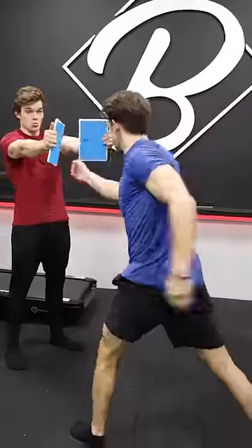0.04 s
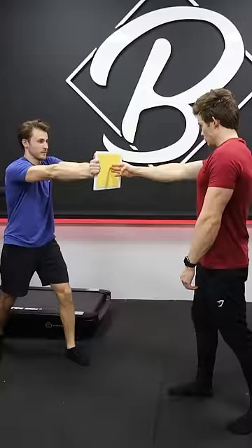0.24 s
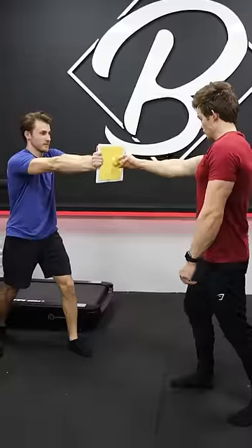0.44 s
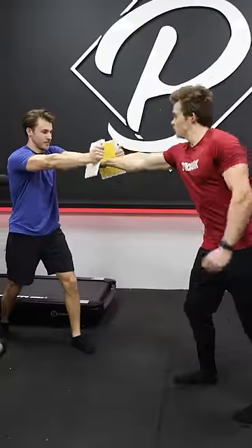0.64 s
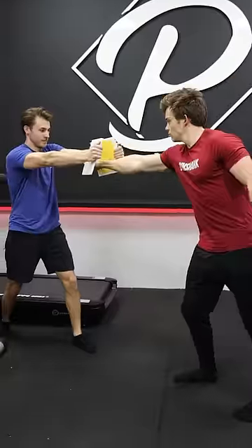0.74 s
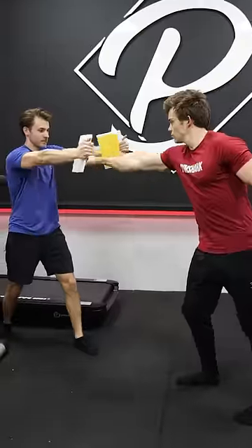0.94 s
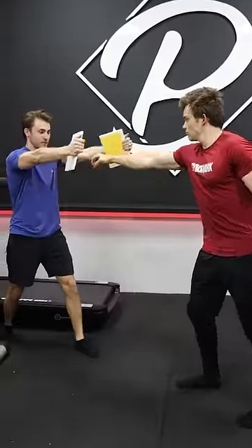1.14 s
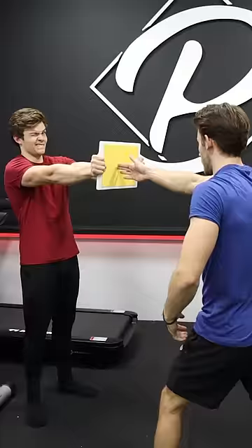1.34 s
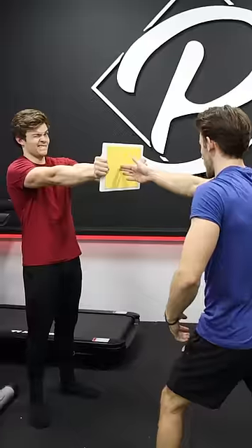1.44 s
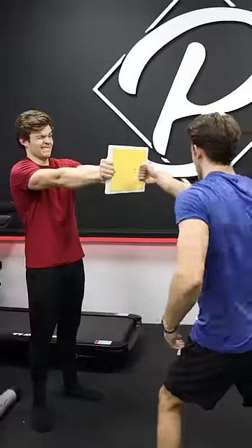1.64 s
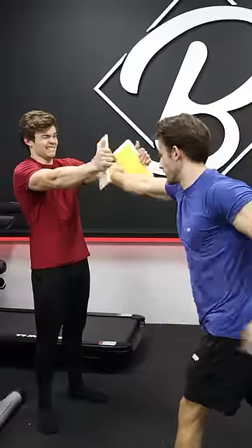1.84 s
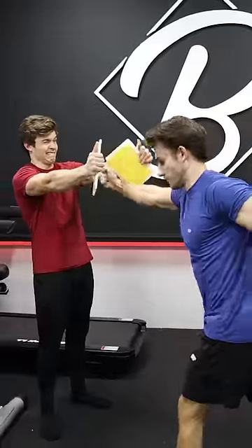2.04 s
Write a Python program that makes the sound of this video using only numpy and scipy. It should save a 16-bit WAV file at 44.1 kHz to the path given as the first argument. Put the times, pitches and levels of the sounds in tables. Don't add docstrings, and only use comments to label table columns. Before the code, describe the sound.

Loud wooden-sounding board cracks, about a second apart, in a hard-walled gym with low ventilation hum, shifting feet and rustling cloth; each clips the microphone, and the level ducks before the echo swells back.

```python
import sys
import numpy as np
from scipy import signal
from scipy.fft import rfft, irfft, next_fast_len
from scipy.io import wavfile

SR = 44100
rng = np.random.default_rng(int(sys.argv[2]) if len(sys.argv) > 2 else 0)


def natural_amplitude(level_db):
    exponent = np.asarray(level_db, float) / 20
    return 10 ** exponent


def pcm_store(signal):
    levels = np.round(np.clip(np.atleast_2d(signal), -1, 1) * 32767)
    wavfile.write(sys.argv[1], SR, levels.astype(np.int16).T)


N = 92698

# [t/s, snap level/dB]
BREAK_EVENTS = [
    (0.641, 20),
    (1.8117, 20),
]
# [f/Hz, bandwidth/Hz, level/dB]
BOARD_MODES = [(684, 44, 7), (1235, 50, -7), (1900, 140, 1), (2560, 50, -3), (2820, 110, -5),
               (3600, 240, -2)]
# [f/Hz, level/dB]
CRACK_SPECTRUM = [(100, -35), (450, -27), (900, -2.5), (1500, -5.5), (3500, 1.5), (6000, -11.5),
                  (9000, -25.5), (16000, -33)]


def unit(x):
    return x / np.sqrt(np.mean(x ** 2) + 1e-30)


def along(points, hz):
    f, v = np.transpose(points)
    return np.interp(np.log(hz + 1), np.log(f + 1), v)


def filtered(x, response):
    m = next_fast_len(len(x) + SR // 2)
    spectrum = rfft(x, m) * response(np.fft.rfftfreq(m, 1 / SR))
    return irfft(spectrum, m)[:len(x)]


def peak(f, hz, width):
    return 1j * f * width / (hz * hz - f * f + 1j * f * width)


def add(track, s, sound):
    part = track[round(s * SR):][:len(sound)]
    part += sound[:len(part)]


def struck(modes, broad_db, colour):
    t = np.arange(SR // 4) / SR
    ring = 0
    for hz, width, db in modes:
        ring = ring + natural_amplitude(db) * width * np.exp(-np.pi * width * t) * np.sin(2 * np.pi * hz * t)
    cepstrum = irfft(np.log(natural_amplitude(along(colour, np.fft.rfftfreq(len(t), 1 / SR)))), len(t))
    cepstrum[1:len(t) // 2] *= 2
    cepstrum[len(t) // 2:] = 0
    crack = irfft(np.exp(rfft(cepstrum)), len(t))
    blow = unit(ring) + natural_amplitude(broad_db) * unit(crack)
    return blow / np.abs(blow).max()


def hall(x):
    # [f/Hz, T60/s]
    decay_times = [(150, .4), (450, .42), (700, .6), (3000, .62), (7000, .54), (14000, .44)]
    level_db, rise_s, early_db, early_s = 15.5, 0.0061, 2.5, 0.023
    hz, t, z = signal.stft(rng.standard_normal(SR * 3 // 2), SR, nperseg=256)
    decay = natural_amplitude(-60 * t / along(decay_times, hz)[:, None])
    tail = signal.istft(z * decay, SR, nperseg=256)[1]
    s = np.arange(len(tail)) / SR
    onset = (1 - np.exp(-s / rise_s)) * natural_amplitude(early_db * np.exp(-s / early_s))
    tail = tail / np.linalg.norm(tail) * onset
    return natural_amplitude(level_db) * signal.fftconvolve(x, tail)[:len(x)]


def frame(s):
    # [f/Hz, level/dB, T60/s]
    steel_modes = [(1051, -60, 2), (1700, -68, 2)]
    t = np.maximum(np.arange(N) / SR - s, 0)
    return sum(natural_amplitude(db - 60 * t / t60) * np.sin(2 * np.pi * hz * t) for hz, db, t60 in steel_modes)


def blue_board():
    # [f/Hz, bandwidth/Hz, level/dB]
    blue_modes = [(565, 34, -10), (1570, 73, -5), (2800, 75, -2), (3170, 70, -4), (3910, 100, -6),
                  (4500, 260, 1),
                  (6140, 240, -8), (8270, 130, -8), (10200, 120, -38)]
    # [f/Hz, level/dB]
    blue_spectrum = [(100, -5), (400, 5), (1000, 2.5), (4000, 0), (7000, 16), (10000, -36), (16000, -54)]
    ago_s, level_db, broad_db = 0.26, 0.5, -13.5
    lead = round(ago_s * SR)
    x = np.zeros(N + lead)
    add(x, 0, natural_amplitude(level_db) * struck(blue_modes, broad_db, blue_spectrum))
    return hall(x)[lead:] + frame(-ago_s * 2)


def room_tone(shot):
    # [f/Hz, density/dB per Hz]
    air_spectra = [
        [(15, -46), (25, -15), (97, 3), (200, -2.5), (242, -23), (277, -14), (384, -32), (516, -13),
         (16000, -32.5)],
        [(15, -33), (25, -7.5), (97, -7), (200, -25), (242, -13.5), (277, -25), (384, -22.5), (516, -32),
         (16000, -40)],
        [(15, -38), (25, 8.5), (97, 1), (114, -12), (185, -3.5), (335, -19), (754, -14), (1740, -21.5),
         (16000, -35)],
    ]
    air_db = [-58.5, -61.5, -57.5]
    # [f/Hz, bandwidth/Hz, first-shot level/dB, later level/dB]
    hum_bands = [(95.9, 12, -51.5, -63), (143, 30, -59.5, -73.5), (221.4, 5, -88, -74.5),
                 (411, 6, -79, -80.5)]
    air = unit(filtered(rng.standard_normal(N), lambda f: natural_amplitude(along(air_spectra[shot], f))))
    hum = np.zeros(N)
    for hz, width, first_db, later_db in hum_bands:
        band = unit(filtered(rng.standard_normal(N), lambda f: peak(f, hz, width) ** 2))
        hum += natural_amplitude(later_db if shot else first_db) * band
    return natural_amplitude(air_db[shot]) * air + hum


def steps_and_rustles():
    # [t/s, level/dB, f/Hz, T60/s]
    footfalls = [
        (0.0, -45, 60, .5),
        (0.085, -42, 110, .3),
        (0.82, -50, 150, .6),
        (1.96, -42, 110, .6),
    ]
    # [t/s, level/dB, f/Hz, T60/s]
    rustles_and_slaps = [
        (1.618, -59, 700, .1),
        (1.66, -56, 3500, .12),
        (1.694, -59, 3000, .08),
        (1.72, -60, 500, .4),
        (1.752, -57, 1800, .5),
        (0.55, -72, 1500, 1),
        (0.6205, -48, 6000, .06),
        (1.7995, -42, 6000, .06),
    ]
    x, t = np.zeros(N), np.arange(SR // 3) / SR
    for s, db, hz, t60 in rustles_and_slaps + footfalls:
        soft = unit(filtered(rng.standard_normal(len(t)), lambda f: peak(f, hz, 1.5 * hz) ** 2))
        swell = 1 - np.exp(-t * hz / 8)
        fade = np.cos(np.pi / 2 * t / t[-1])
        add(x, s, natural_amplitude(db - 60 * t / t60) * swell * fade * soft)
    return x


def air_push():
    push_hz, t60_s = 200, 0.03
    t = np.arange(SR // 4) / SR
    return natural_amplitude(-60 * t / t60_s) * np.sin(2 * np.pi * push_hz * t)


def thuds(shot):
    # [t/s, level/dB, softness cut-off f/Hz, shot]
    contacts = [
        (0.6206, -22, 700, 1),
        (0.6229, -16, 620, 1),
        (0.6289, -21, 570, 1),
        (0.6358, -17.5, 570.4, 1),
        (1.8, 0, 1620, 2),
        (1.7987, -26.5, 1610, 2),
        (1.8047, -26, 1020, 2),
    ]
    t60_s, push_db = 0.022, -20.5
    x, t = np.zeros(N), np.arange(SR // 4) / SR
    for s, db, hz, which in contacts:
        if which == shot:
            blow = -struck(BOARD_MODES[:3], 2.1, CRACK_SPECTRUM)
            thud = filtered(blow, lambda f: 1 / (1 + 1j * f / hz) ** 2) * natural_amplitude(-60 * t / t60_s)
            add(x, s, natural_amplitude(db) * (thud / np.abs(thud).max() - natural_amplitude(push_db) * air_push()))
    return x


def snap():
    end_hz, glide_hz, glide_s, t60_s = 3180, 1296, 0.00065, 0.0039
    splinter_t60_s, splinter_db = 0.0054, -11
    t = np.arange(SR // 4) / SR
    cycles = end_hz * t + glide_hz * glide_s * (1 - np.exp(-t / glide_s))
    onset = 1 - np.exp(-(t / 0.00012) ** 2)
    chirp = np.sin(2 * np.pi * cycles) * natural_amplitude(-60 * t / t60_s) * onset
    splinters = natural_amplitude(splinter_db - 60 * t / splinter_t60_s) * rng.standard_normal(len(t))
    return chirp + splinters


def knocks(break_s):
    # [t/s, level/dB, number of modes rung]
    collisions = [
        (0.647, 3, 3),
        (0.651, -2.5, 6),
        (0.663, 3.5, 1),
        (1.8152, 2.5, 3),
        (1.8235, 15.5, 6),
        (1.819, -8, 1),
        (1.99, -21, 2),
    ]
    x = np.zeros(N)
    for s, db, count in collisions:
        if 0 < s - break_s < 0.5:
            add(x, s, natural_amplitude(db) * struck(BOARD_MODES[:count], -13, CRACK_SPECTRUM))
    return x


def yellow_board(shot):
    # [f/Hz, bandwidth/Hz, level/dB]
    upper_modes = [(4570, 100, -9.5), (5250, 220, -5.5), (6250, 120, -17), (8300, 140, -20)]
    # [ring level/dB, air push level/dB]
    after_break = [
        (8, -22.5),
        (8, -18),
    ]
    dry_ring_db, thud_to_hall_db, low_cut_hz = -5, -7.5, 120
    s, snap_db = BREAK_EVENTS[shot - 1]
    ring_db, push_db = after_break[shot - 1]
    direct = thuds(shot)
    ring = np.zeros(N)
    add(ring, s, natural_amplitude(ring_db) * struck(BOARD_MODES + upper_modes, -1, CRACK_SPECTRUM))
    wet = hall(ring + natural_amplitude(thud_to_hall_db) * direct)
    direct += knocks(s)
    add(direct, s, natural_amplitude(snap_db) * snap() + natural_amplitude(push_db) * air_push())
    mix = direct + natural_amplitude(dry_ring_db) * ring + wet
    return filtered(mix, lambda f: (1j * f / (low_cut_hz + 1j * f)) ** 3) + frame(s)


def tick():
    start_s, level_db, tick_hz, t60_s = 1.6572, -51, 1930, 0.035
    hiss_db, hiss_t60_s = -48, 0.0061
    x, t = np.zeros(N), np.arange(SR // 3) / SR
    tone = sum(np.sin(2 * np.pi * k * tick_hz * t) * natural_amplitude(-1.6 * k - 240 * k * t) for k in range(1, 6))
    hiss = unit(filtered(rng.standard_normal(len(t)), lambda f: peak(f, 5300, 8000)))
    add(x, start_s, natural_amplitude(level_db - 60 * t / t60_s) * tone + natural_amplitude(hiss_db - 60 * t / hiss_t60_s) * hiss)
    return x


def scene():
    cuts = [0.313, 1.403]
    fade_s = 0.0017
    past = np.clip((np.arange(N) / SR - np.array(cuts)[:, None]) / fade_s, 0, 1)
    shares = [1 - past[0], past[0] - past[1], past[1]]
    takes = [blue_board(), yellow_board(1), yellow_board(2)]
    mix = steps_and_rustles() + tick()
    for shot, take in enumerate(takes):
        mix = mix + shares[shot] * (take + room_tone(shot))
    return mix[None]


def roll_off(x):
    return signal.sosfilt(signal.butter(12, 16990, fs=SR, output="sos"), x)


def record(dry):
    mic_hz, top_hz, clip_top, clip_hard = 15750, 16800, 0.7, 8
    duck_db, duck_s, recover_s = 23, 0.012, 0.232
    since = np.maximum(np.arange(N) / SR - np.array(BREAK_EVENTS)[:, :1], 0)
    recovery = np.clip(1 - since / recover_s, 0, 1)
    gain_db = -(duck_db * (1 - np.exp(-since / duck_s)) * recovery).sum(axis=0)
    band_limit = signal.cheby2(12, 40, mic_hz + 250, fs=SR, output="sos")
    x = (signal.sosfilt(band_limit, dry) * natural_amplitude(gain_db))[0]
    x = x / (1 + np.abs(x / clip_top) ** clip_hard) ** (1 / clip_hard)
    mix = filtered(x, lambda f: np.clip((top_hz - f) / 900, 0, 1) * 1j * f / (20 + 1j * f))
    return roll_off(mix[None])


dry = scene()
out = record(dry)
pcm_store(out)
```